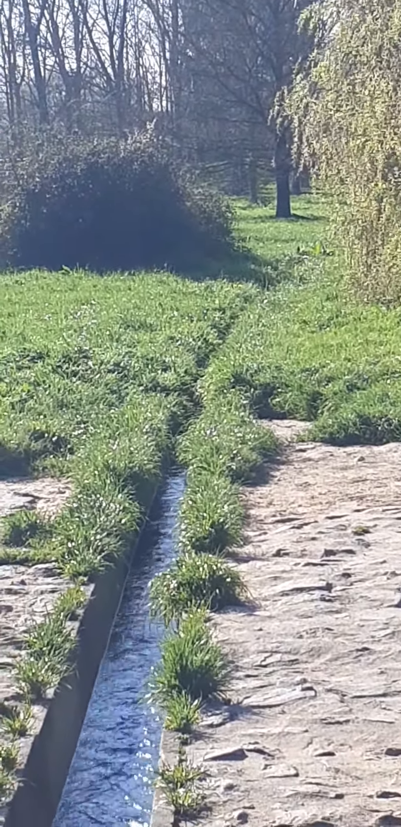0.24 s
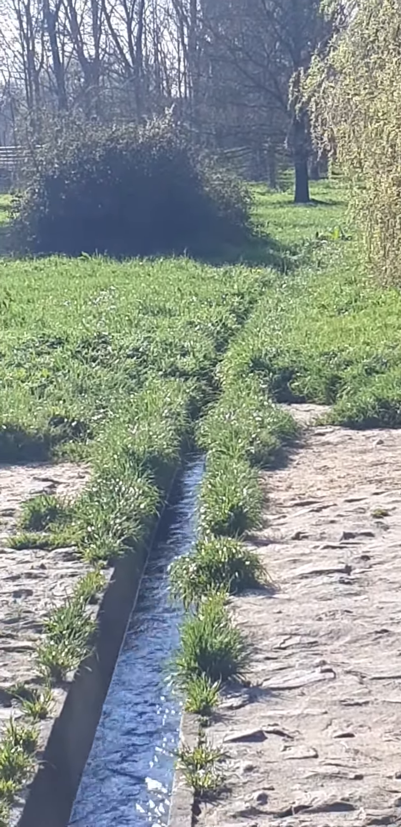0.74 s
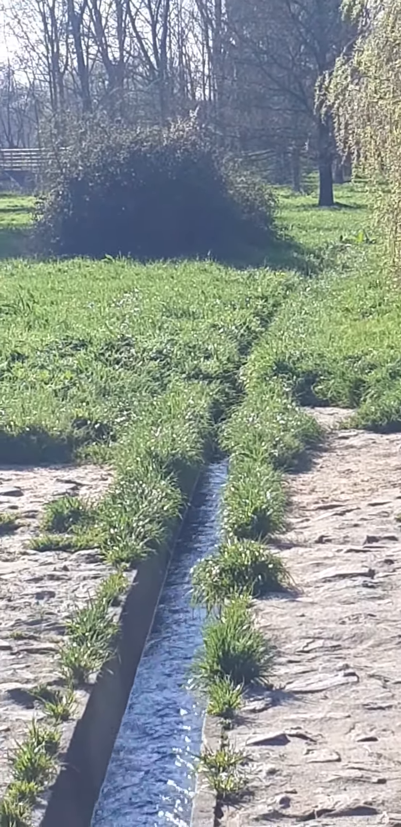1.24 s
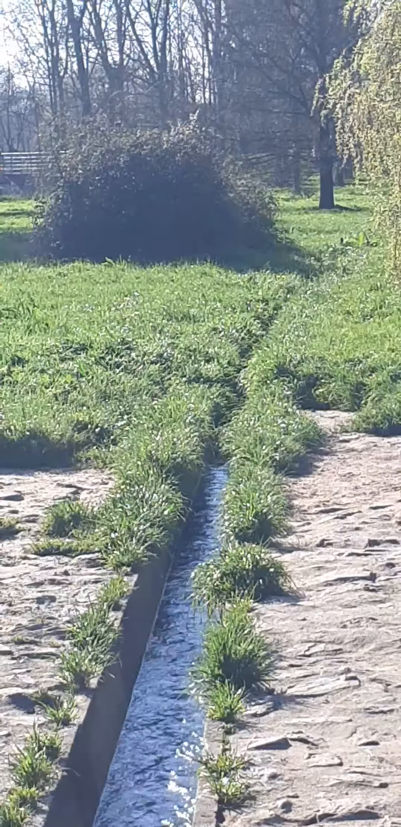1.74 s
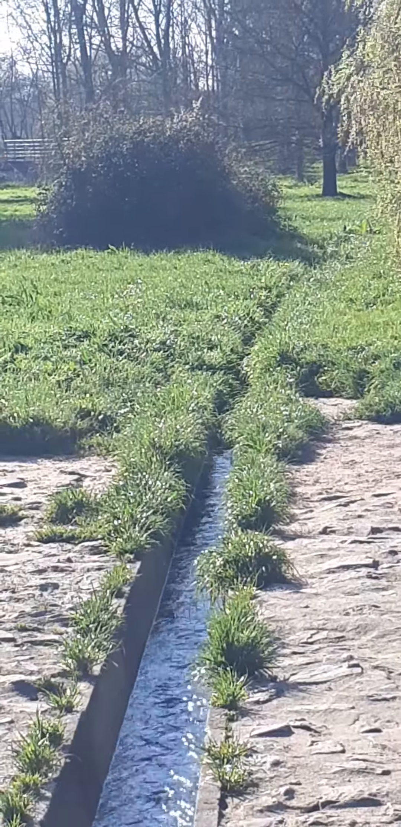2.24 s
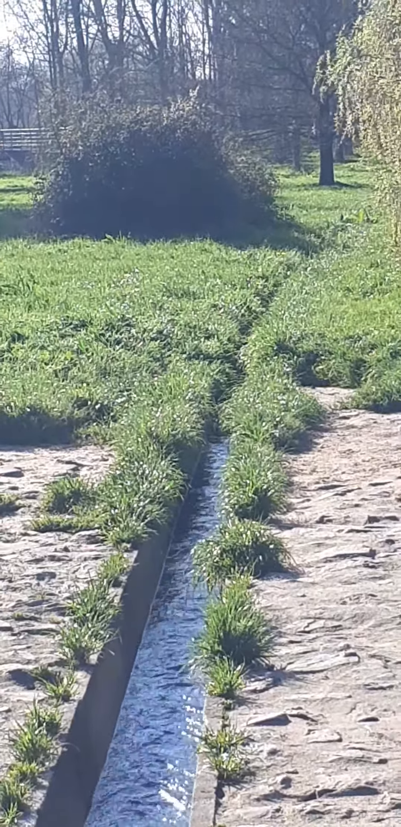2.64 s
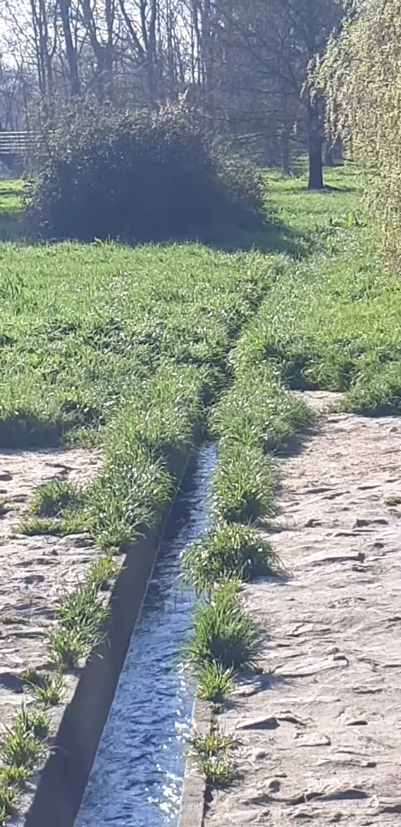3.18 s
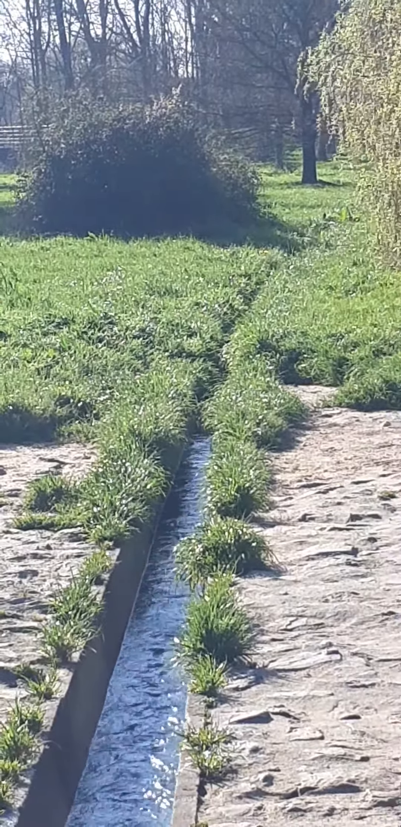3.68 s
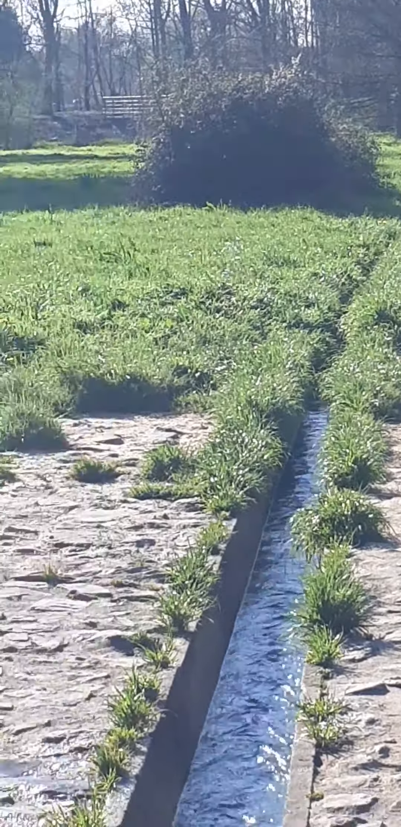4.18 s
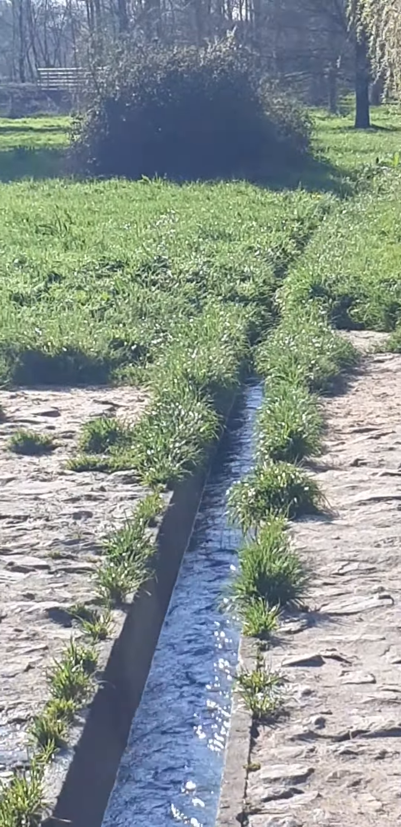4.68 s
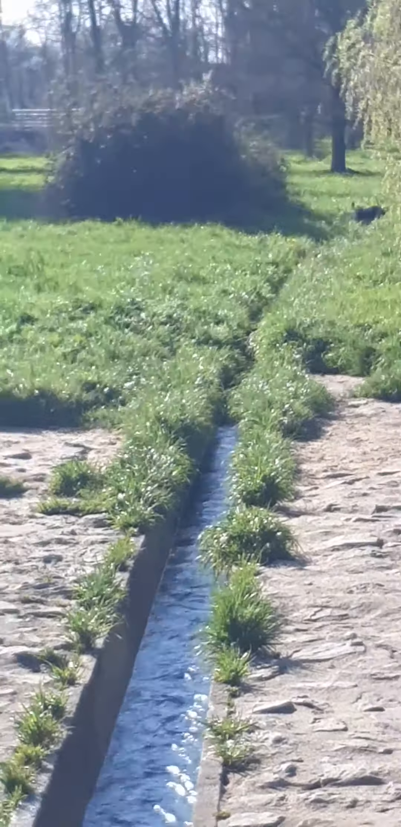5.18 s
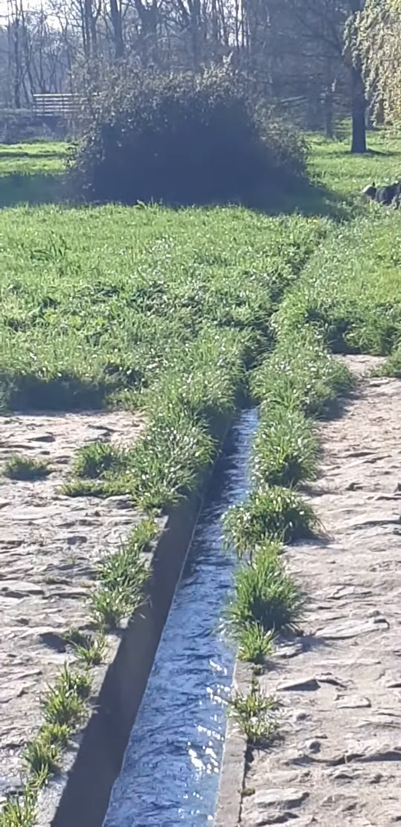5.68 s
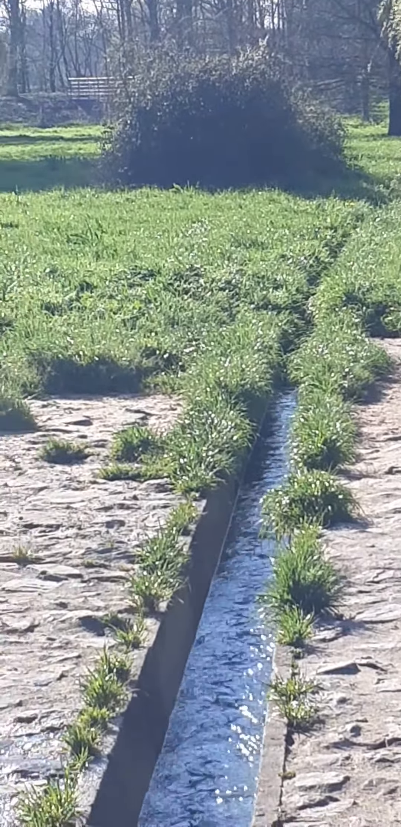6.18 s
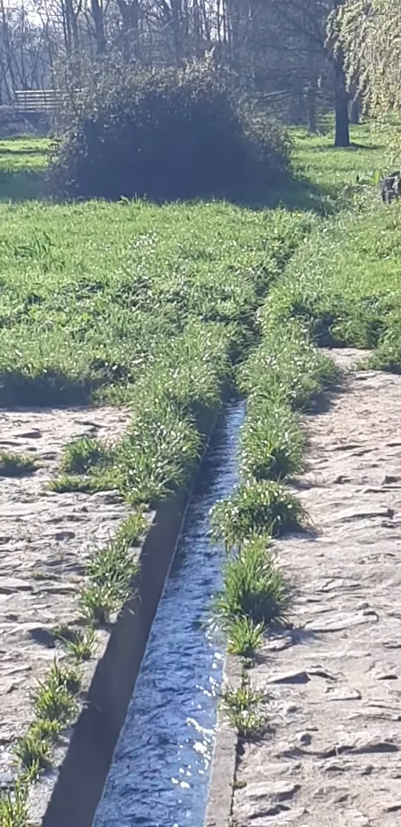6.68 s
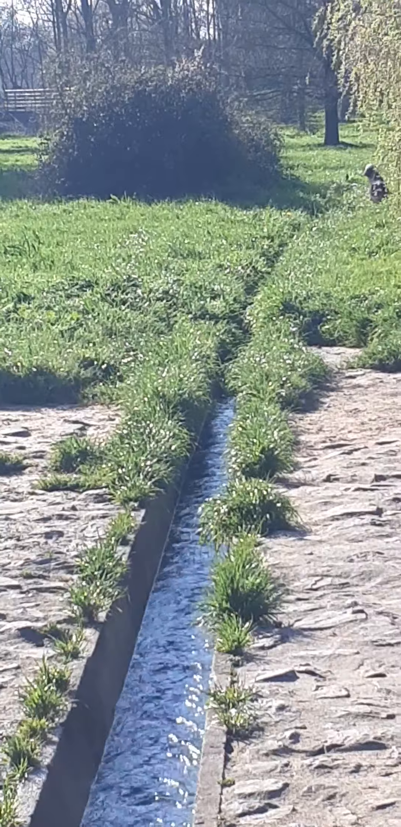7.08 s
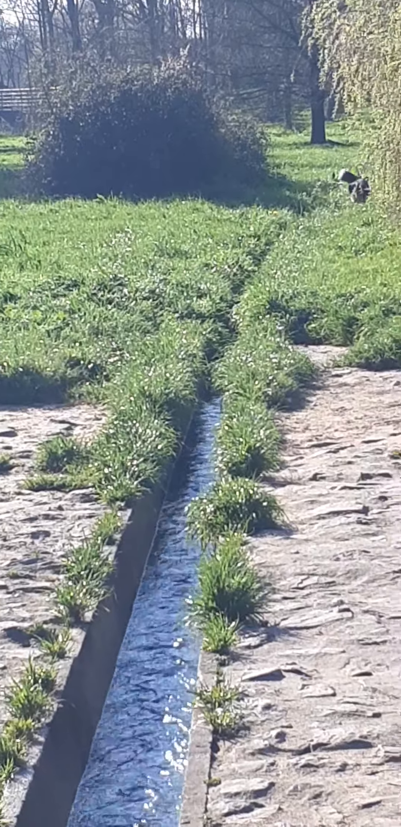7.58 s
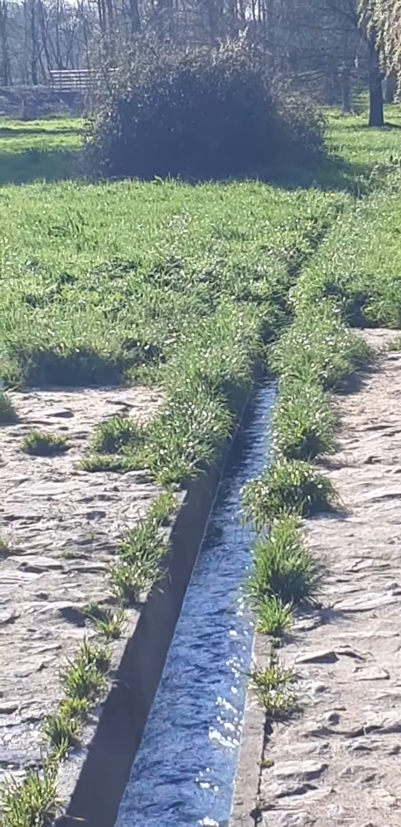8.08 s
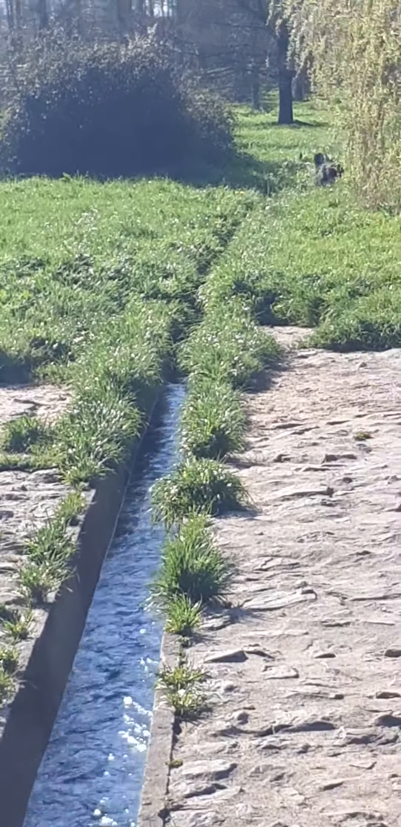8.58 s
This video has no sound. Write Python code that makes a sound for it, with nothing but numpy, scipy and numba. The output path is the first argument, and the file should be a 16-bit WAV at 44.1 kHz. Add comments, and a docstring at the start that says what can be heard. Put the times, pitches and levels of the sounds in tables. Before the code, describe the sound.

Water trickles and plops along a narrow stone channel while a distant engine swells and fades, and a finger thumps and rubs across the microphone.

```python
"""Water trickles along a shallow stone channel in a park: a filtered-noise wash, many small gliding rings, single plops.
Far off an engine (three firing orders) speeds up, then slows, over traffic rumble (low noise).
A finger on the right microphone port muffles that side (low-pass), thumps (falling rings) and rubs there (grainy
noise and clicks), then seals it tighter; a hard tap on the case (short ring, low push) is heard mostly on the left.
The gain control sinks after the handling noise and recovers."""
import sys
import numpy as np
from scipy import signal
from scipy.fft import rfft, irfft, next_fast_len
from scipy.io import wavfile
from scipy.ndimage import uniform_filter1d, minimum_filter1d
from numba import njit

SR = 44100
rng = np.random.default_rng(int(sys.argv[2]) if len(sys.argv) > 2 else 0)


def unload_wav(signal):
    """Save mono or channel-first audio to the path in sys.argv[1] as 16-bit WAV at rate SR, clipped to [-1, 1]."""
    wavfile.write(
        sys.argv[1],
        SR,
        np.round(np.clip(np.atleast_2d(signal).T, -1, 1) * 32767).astype(np.int16),
    )


def volts(x):
    """Linear amplitude factor 10**(x/20) for a level x in dB, scalar or array-like."""
    e = np.asarray(x, float) / 20
    return 10 ** e


N = 389403


def rms_one(x):
    """Scale to unit rms."""
    return x / np.sqrt(np.mean(x ** 2) + 1e-20)


def in_time(rows, outside=None):
    """Table columns as curves over all samples; first column t/s."""
    s, *columns = np.transpose(rows)
    t = np.arange(N) / SR
    return [np.interp(t, s, c, outside, outside) for c in columns]


def at_hz(points, hz):
    """Read a spectrum, linear in dB over log frequency."""
    points_hz, db = np.transpose(points)
    return np.interp(np.log(hz), np.log(points_hz), db)


def coloured(x, spectrum):
    """Shape white noise to a spectrum; rms 1."""
    size = next_fast_len(N)
    hz = np.maximum(np.arange(size // 2 + 1) * SR / size, 1)
    shaped = irfft(rfft(x, size) * volts(at_hz(spectrum, hz)), size)
    return rms_one(shaped[..., :N])


def drift(rate_hz):
    """Slow random curve, rms 1: noise through a double pole, made at SR / 40."""
    r = np.exp(-80 * np.pi * rate_hz / SR)
    white = rng.standard_normal(N // 40 + 2002)
    slow = signal.lfilter([1], [1, -2 * r, r * r], white)[2000:]   # drop the settling
    return np.interp(np.arange(N) / 40, np.arange(len(slow)), rms_one(slow))


def cut(x, hz, kind, order):
    """Butterworth low- or high-pass."""
    return signal.sosfilt(signal.butter(order, hz, kind, fs=SR, output="sos"), x)


@njit
def add(out, at, height, start, end, glide, t60, rise):
    """Add dying sines gliding from start to end; times in samples, pitch in radians a sample."""
    for k in range(len(at)):
        phase = 0.0
        for i in range(min(int(t60[k]), len(out) - at[k])):
            phase += end[k] + (start[k] - end[k]) * np.exp(-i / glide[k])
            envelope = 1000.0 ** (-i / t60[k]) * (1 - np.exp(-i / rise[k]))
            out[at[k] + i] += height[k] * np.sin(phase) * envelope


def chirps(s, height, start_hz, end_hz, glide_s, t60_s, rise_s):
    """One gliding, dying ring per event."""
    out, ones = np.zeros(N), np.ones(len(s))
    radians = 2 * np.pi / SR * ones
    samples = SR * ones
    add(out, (s * SR).astype(np.int64), height * ones, start_hz * radians, end_hz * radians,
        glide_s * samples, t60_s * samples, rise_s * samples)
    return out


# self-noise spectrum: f/Hz, density/dB per Hz (relative)
SELF_NOISE_TONE = [(200, 12.5), (600, 4), (1500, -63), (3500, 1.5), (7000, -3), (10000, -1), (14500, 2.5),
                   (16000, -5)]
SELF_NOISE_DB = -73.5


def self_noise():
    """Microphone hiss, independent at each port."""
    return volts(SELF_NOISE_DB) * coloured(rng.standard_normal((2, N)), SELF_NOISE_TONE)


# traffic level: t/s, level/dB
RUMBLE_LEVEL = [(0, -55.5), (1.0, -51), (2, -56), (7, -52), (8.83, -60)]
# traffic spectrum: f/Hz, density/dB per Hz (relative)
RUMBLE_TONE = [(25, -19), (50, -3), (90, 1.5), (160, -0.5), (250, -2.5), (400, -18), (700, -47.5)]


def rumble(alike):
    """Far traffic as low noise, partly alike at the two ports."""
    mid, side = coloured(rng.standard_normal((2, N)), RUMBLE_TONE)
    alike = np.clip(alike, 0, 1)
    level = volts(in_time(RUMBLE_LEVEL)[0] + 2.4 * drift(4.8))
    return level * (np.sqrt(alike) * mid + np.sqrt(1 - alike) * side * [[1], [-1]])


# engine run: t/s, firing f/Hz, level/dB (before exhaust), throttle/0-1
ENGINE_RUN = [(0.0, 62.8, -59, 0.98), (0.5, 64.75, -52.5, 1), (1.0, 66.85, -46.5, 0.68),
              (1.5, 68.7, -48, 0.28), (1.75, 68.3, -53, 0.3), (2.2, 65.6, -59, .05), (2.7, 61.4, -55, 0),
              (3.5, 57.6, -58, 0.8), (4.2, 53, -62, 0.1), (5.5, 47.07, -57, 0.3), (6.0, 45.94, -45.5, .2),
              (7.5, 40.24, -53, 0), (8.83, 38.2, -65, .5)]
# exhaust resonances: f/Hz, gain/dB
EXHAUST_GAIN = [(38, -49), (48, -5), (56, 1), (66, -1), (90, -9), (105, -7), (122, 5.5), (131, 1),
                (137, -6), (165, 4), (200, -0.5)]
OVERRUN_LOSS_DB = 12.5   # third order, throttle shut


def engine():
    """Three orders of the firing rate through exhaust resonances, wavering with the air between."""
    hz, db, throttle = in_time(ENGINE_RUN)
    phase = 2 * np.pi * np.cumsum(hz) / SR
    loss_db = 0, 0, OVERRUN_LOSS_DB * (1 - throttle)
    out = np.zeros(N)
    for k in range(1, 4):
        order_db = db + at_hz(EXHAUST_GAIN, k * hz) - loss_db[k - 1] + 1.13 * drift(3.2)
        out += volts(order_db) * np.sin(k * phase)
    return np.sqrt(2) * out


SPRAYS_PER_S, SPRAY_DB = 25, -52   # rate before clumping; level of the weakest, before the envelope


def sprays():
    """Tiny drops tick back into the stream: clumped, short, high rings of rising pitch."""
    at = np.flatnonzero(rng.random(N) < SPRAYS_PER_S * volts(5.0 * drift(4.0)) / SR)
    draw = rng.random((N, 2))[at]
    hz = 3200 * (5600 / 3200) ** draw[:, 0]
    height_db = SPRAY_DB + 3.6 * np.minimum(-np.log(draw[:, 1]), 3)
    return chirps(at / SR, volts(height_db), hz, 1.26 * hz, .002, 18.6 / hz, 0.89 / hz)


def bubbles(spectrum, per_s, clump_db, spread_db, cycles, climb):
    """Air trapped in clumps; each bubble rings some cycles and climbs in pitch as it nears the surface."""
    at = np.flatnonzero(rng.random(N) < per_s * volts(clump_db * drift(9.0)) / SR)
    draw = rng.random((N, 3))[at]
    hz = 400 * (6500 / 400) ** draw[:, 0]
    size_db = spread_db * np.minimum(-np.log(draw[:, 1]), 4)
    height_db = size_db + at_hz(spectrum, hz) + 20 * np.log10(hz)
    t60 = cycles * (.5 + draw[:, 2]) / hz
    return rms_one(chirps(at / SR, volts(height_db), hz, hz * climb, t60, t60, 0.54 / hz))


# flow of wash and small bubbles: t/s, level/dB
WATER_FLOW = [(0.0, -46.5), (8.83, -45)]
# water spectrum: f/Hz, density/dB per Hz (relative)
WATER_TONE = [(190, -73), (330, -20), (376, -9), (412, -15), (464, -8.5), (542, -2), (1100, -2), (1250, 1),
              (1800, -3), (2340, -2.5), (3900, -22), (5270, -23), (7500, -67.5), (9750, -75.5),
              (16500, -120)]
# single bubbles, mostly clear, one too faint to hear: t/s, level/dB (before the envelope), nominal f/Hz, t60/s
SINGLE_PLOPS = [(0.172, -27.5, 1742, 0.017), (0.479, -22, 2000, 0.011), (0.541, -30.5, 930, 0.034),
                (0.585, -28.5, 770, 0.051), (0.589, -27.5, 1230, 0.026), (0.647, -36, 970, 0.064),
                (0.975, -36, 797, 0.068), (1.481, -33.5, 1155, 0.048), (1.796, -30, 1636, .039),
                (1.853, -24.5, 2018, 0.017), (1.991, -37, 695, 0.11), (2.019, -29, 1214, .06),
                (2.083, -28.5, 2280, 0.022), (2.245, -45, 520, 0.089), (2.41, -34, 780, 0.037),
                (2.429, -28, 1520, .025), (2.561, -28, 1470, 0.038), (2.72, -35, 711, .05),
                (2.751, -26.5, 1400, .019), (3.025, -41, 561, 0.1), (3.15, -28, 2290, 0.021),
                (3.162, -31, 1285, 0.063), (3.306, -28.5, 1529, 0.036), (3.537, -27, 2024, .017),
                (3.907, -30.5, 686.5, 0.048), (4.194, -28, 516, 0.035), (4.231, -26, 667, .02),
                (4.54, -89, 1076, 0.049), (5.35, -26.5, 1540, 0.031), (5.385, -26.5, 1470, .03),
                (6.215, -30.5, 656, 0.029), (6.359, -31.5, 2420, 0.038), (6.374, -28.5, 1636, 0.024),
                (6.507, -19, 1890, 0.0072), (6.673, -27, 790, 0.027), (6.71, -33.5, 1736, 0.019),
                (6.79, -28, 1810, .036), (6.894, -26, 2955, .012), (6.958, -28, 1892, .044),
                (7.042, -44, 741, 0.065), (7.083, -30, 838, 0.09), (7.241, -34, 650, .06),
                (7.243, -33.5, 2068, .034), (7.445, -35, 645, 0.081), (7.737, -26, 2340, 0.013),
                (7.739, -28.5, 1137, .044), (7.896, -30, 1740, 0.028), (7.936, -27, 1765, 0.013),
                (7.968, -32, 2271, .03), (8.267, -35, 930, 0.035), (8.352, -27, 1598, .015),
                (8.359, -26, 2410, 0.013), (8.624, -27, 1430, 0.039), (8.666, -29.5, 1937, .027)]


def water():
    """Dense small bubbles on a patchy wash thinned in the lows, plus single plops of rising pitch."""
    wash = cut(coloured(rng.standard_normal(N), WATER_TONE), 700, "high", order=2)
    wash = wash * volts(1.6 * drift(17.4))
    small = bubbles(WATER_TONE, 550.0, clump_db=3.0, spread_db=3.0, cycles=42.2, climb=1.307)
    s, db, hz, t60 = np.transpose(SINGLE_PLOPS)
    plops = chirps(s, volts(db), .96 * hz, 1.093 * hz, 0.56 * t60, t60, 0.56 / hz)
    return volts(in_time(WATER_FLOW)[0]) * (volts(-1.5) * wash + small) + plops


# share leaking past the finger: t/s, level/dB
FINGER_LEAK = [(0, -3), (4.4, -5), (5.25, -15), (6.4, -23), (8.83, -30)]


def through_finger(x):
    """Skin passes the bass; a leak passes a dulled share of the rest up to a steep edge."""
    leak = volts(in_time(FINGER_LEAK)[0])
    dulled = cut(x, 645, "low", order=1)
    edged = signal.sosfiltfilt(signal.butter(6, 1450, fs=SR, output="sos"), dulled)
    return (1 - leak) * cut(x, 148, "low", order=2) + leak * edged


# trapped-air thumps: t/s, level/dB (before the envelope), settled f/Hz, polarity of the first swing (+1 or -1)
AIR_THUMPS = [(0.761, -35, 70, -1), (0.8277, -25.5, 70, -1), (3.985, -28.5, 96, -1), (4.061, -22.5, 85, 1),
              (4.0821, -17.5, 69.6, -1), (4.1956, -19.5, 99, 1), (4.263, -25.5, 91.8, 1),
              (4.4178, -8, 163, -1), (4.433, -15, 70, 1), (4.5687, -13, 176, 1), (4.5949, -11, 120, -1),
              (4.634, -27, 146, 1), (4.822, -9, 146, -1), (4.8311, -12, 145, 1), (4.8617, -6.5, 195, 1),
              (4.972, -29, 100, 1), (5.0393, -13, 96.12, 1), (5.075, -19, 99, 1), (5.1403, -9.5, 210, -1),
              (5.322, -15, 85.8, -1), (5.3732, -21.5, 81.54, -1), (5.7908, -32.5, 100, -1),
              (5.8061, -25, 70, 1), (5.9402, -29, 120, 1), (5.9852, -29.5, 120, 1), (6.3072, -7, 86, -1),
              (6.347, -13.5, 101, -1), (7.216, -21.5, 85, 1), (7.3518, -20.5, 80.5, 1),
              (7.3913, -33, 85, -1), (7.41, -29.5, 85.5, 1)]
THUMP_START_ABOVE_HZ, THUMP_LEFT_DB = 235, -26


def thumps():
    """Air squeezed under the fingertip: falling rings; the case carries a little to the left port."""
    s, db, hz, polarity = np.transpose(AIR_THUMPS)
    height = np.sign(polarity) * volts(db)
    right = chirps(s, height, hz + THUMP_START_ABOVE_HZ, hz, 0.0016, 0.04, 0.00063)
    return right * volts([[THUMP_LEFT_DB], [0]])


# hard tap on the case: t/s, left gain/dB, right gain/dB, start f/Hz, settled f/Hz, t60/s
CASE_TAP = [(4.417, 15.5, -26, 1090, 480, 0.006)]
TAP_THUD_DB, TAP_THUD_HZ, TAP_THUD_T60_S = -18, 128, 0.042   # settled pitch; level before the envelope


def tap():
    """Short bright ring, mostly left and opposite in sign at the right, and the case's low push on the left."""
    s, left_db, right_db, start_hz, end_hz, t60 = np.transpose(CASE_TAP)
    thud = chirps(s, volts(TAP_THUD_DB), 3.8 * TAP_THUD_HZ, TAP_THUD_HZ, 0.0021, TAP_THUD_T60_S, 0.0012)
    ring = chirps(s, 0.84, start_hz, end_hz, 0.00092, t60, 0.0013)
    ring = cut(ring, 3500, "low", order=4)
    return ring * [-volts(left_db), volts(right_db)] + thud * [[1], [0]]


# long rub, finger pressure as scrub level: t/s, level/dB
RUB_PRESSURE = [(4.416, -53), (4.422, -19), (4.432, -23), (4.446, -32), (4.456, -31), (4.48, -41),
                (4.54, -30.5), (4.572, -21), (4.62, -29.5), (4.635, -30), (4.68, -35), (4.772, -31.5),
                (4.8, -31), (4.83, -22), (4.864, -18), (4.885, -29), (4.912, -38), (4.94, -44)]
# scrub spectrum: f/Hz, density/dB per Hz (relative)
SCRUB_TONE = [(40, -6.5), (170, 0), (400, -8), (900, -16), (1500, -30), (3000, -75)]
# rasp spectrum: f/Hz, density/dB per Hz (relative)
RASP_TONE = [(300, -4.5), (1000, 7), (2000, 1), (3500, -5), (5000, -12.5), (7300, -27), (9500, -12.5),
             (12500, -6.5), (14500, 4.5), (16500, -32)]
# short scuffs: peak t/s, level/dB, rise/s per 20 dB, fall/s per 20 dB
SHORT_SCUFFS = [(0.84, -56.5, 0.36, .15), (4.08, -39.5, 0.046, 0.19), (5.149, -20.5, 0.039, 0.017)]
# skin slipping off the port edge: t/s, level/dB (before the envelope)
SKIN_SLIPS = [(4.4269, -16.5), (4.4318, -17), (4.456, -19.5), (4.4937, -21), (4.551, -34), (4.5585, -20),
              (4.5684, -28), (4.5726, -10.5), (4.6054, -22), (4.6378, -18), (4.8324, -24), (4.8432, -12.5),
              (4.8654, -16)]
SLIDE_START_S, SLIDE_END_S = 4.5, 4.876   # skin mostly sticks before, rests and lifts after
RASP_SLIDING_DB, RASP_RESTING_DB = -12.5, -26.5   # re scrub; sliding value holds at MEAN_PRESSURE_DB
RASP_FOLLOWS, MEAN_PRESSURE_DB = 0.41, -26   # share of the pressure's dB swing kept in the sliding rasp
SCRUB_LEFT_DB, SCRUB_LEFT_LATE_DB, NEARER_LEFT_S = -17, -8.5, 4.79   # finger nears the left port late
CASE_CUT_HZ = 250
SLIP_BODY_DB, SLIP_BURST_DB, SLIP_BURST_S = -12, -18.5, 0.0038   # dB re slip; burst time to 1/e


def rubbing():
    """Grainy friction: low scrub and broad rasp peaking at the port resonance; slips click and swell the rasp."""
    flicker = np.array([drift(60.0), drift(67.0), drift(270.0)])
    grain = rng.standard_normal((3, N)) * volts(3.25 * flicker)
    left, right = coloured(grain[:2], SCRUB_TONE)
    rasp = coloured(grain[2], RASP_TONE)

    t = np.arange(N) / SR
    rub_db, = in_time(RUB_PRESSURE, outside=-200)
    pressure = volts(rub_db)
    for s, db, rise, fall in SHORT_SCUFFS:
        pressure = pressure + volts(db - 20 * np.where(t < s, (s - t) / rise, (t - s) / fall))

    sliding = (t > SLIDE_START_S) & (t < SLIDE_END_S)
    sliding_db = RASP_SLIDING_DB - (1 - RASP_FOLLOWS) * (rub_db - MEAN_PRESSURE_DB)
    rasp_db = np.where(sliding, sliding_db, RASP_RESTING_DB)
    left_db = np.where((t > NEARER_LEFT_S) & sliding, SCRUB_LEFT_LATE_DB, SCRUB_LEFT_DB)
    through_case = volts(left_db) * cut(left, CASE_CUT_HZ, "high", order=1)
    out = pressure * np.array([through_case, right + volts(rasp_db) * rasp])

    s, db = np.transpose(SKIN_SLIPS)
    clicks = chirps(s, volts(db), 13000, 14300, 1, 0.0014, 0.00029)
    bodies = chirps(s, volts(db + SLIP_BODY_DB), 2000, 1100, 0.00019, 0.0018, .0001)
    bursts = sum(volts(d + SLIP_BURST_DB) * np.exp(-((t - at) / SLIP_BURST_S) ** 2) for at, d in zip(s, db))
    out[1] += clicks + bodies + rasp * bursts
    return out


RIGHT_LAG_SAMPLES = 4


def scene():
    """Outside sounds reach the right port slightly late, through the finger; handling and hiss add at the ports."""
    outside = rumble(alike=0.99) + engine() + sprays() + water()
    late_right = np.roll(outside[1], RIGHT_LAG_SAMPLES)
    ports = np.array([outside[0], through_finger(late_right)])
    handling = cut(thumps() + tap() + rubbing(), 53, "high", order=2)
    return ports + handling + self_noise()


def top_cut(x):
    """Nothing passes above the cut-off."""
    return signal.sosfilt(signal.butter(12, 16650, fs=SR, output="sos"), x)


def record(dry):
    """Gain control: both sides sink when averaged power passes -40 dB, hold a while, then recover."""
    averaged = uniform_filter1d(np.mean(dry ** 2, axis=0), size=5001, origin=2500)   # trailing window
    over_db = np.maximum(10 * np.log10(averaged + 1e-12) + 40, 0)
    held_db = -minimum_filter1d(-over_db, size=19001, origin=9500)   # trailing maximum
    r = np.exp(-1 / (.2 * SR))   # 0.2 s smoothing
    sink_db = 0.23 * signal.lfilter([1 - r], [1, -r], held_db)
    return top_cut(dry * volts(-sink_db))


dry = scene()
out = record(dry)
unload_wav(out)
```